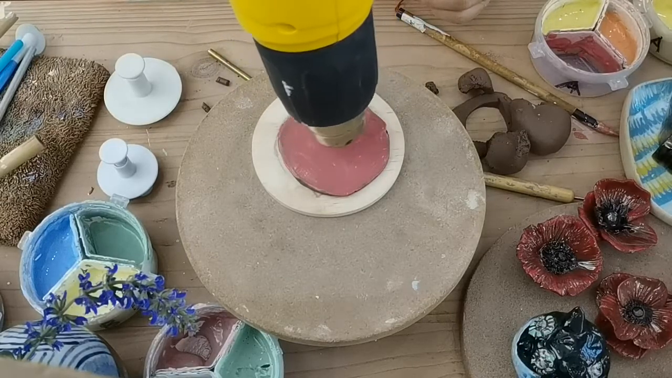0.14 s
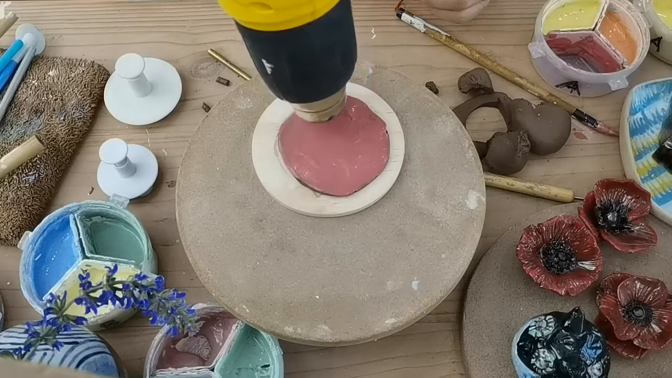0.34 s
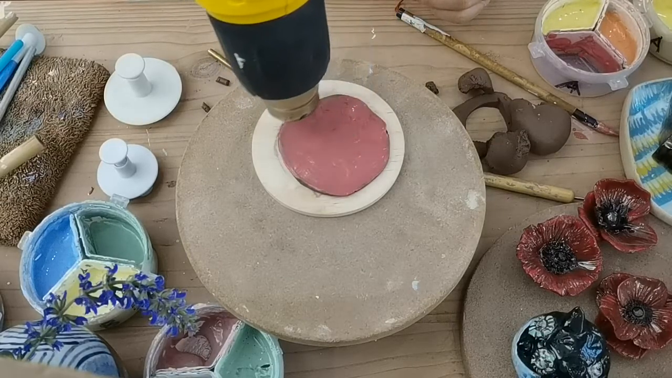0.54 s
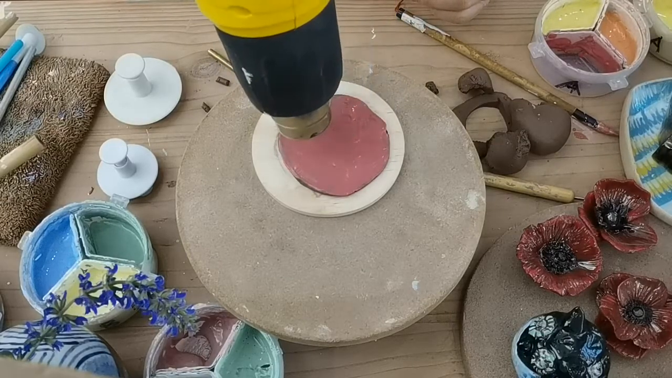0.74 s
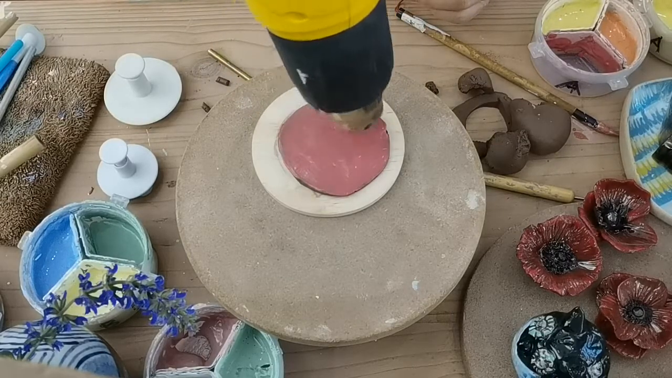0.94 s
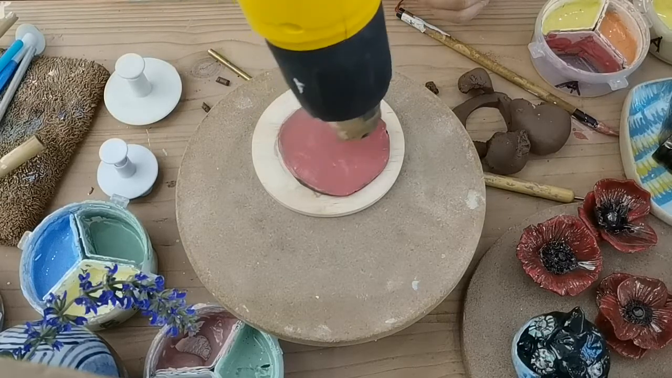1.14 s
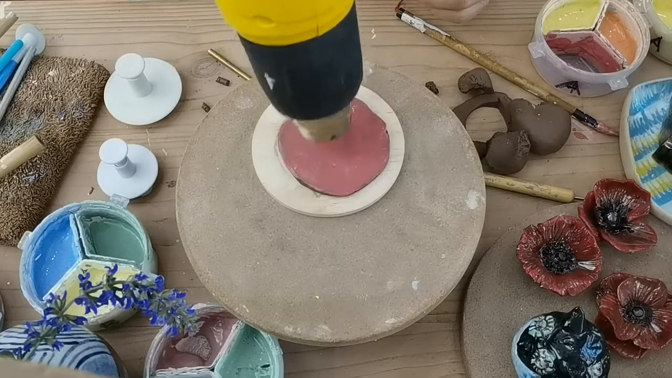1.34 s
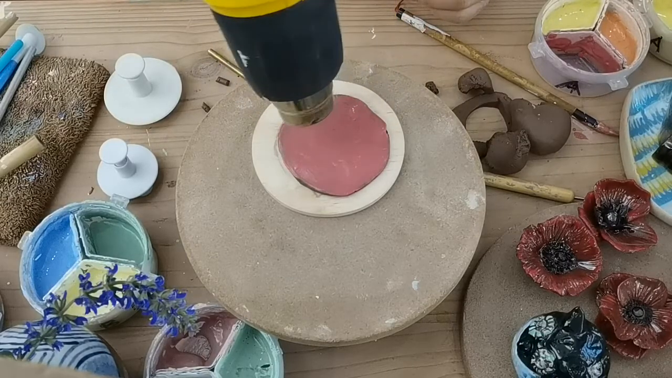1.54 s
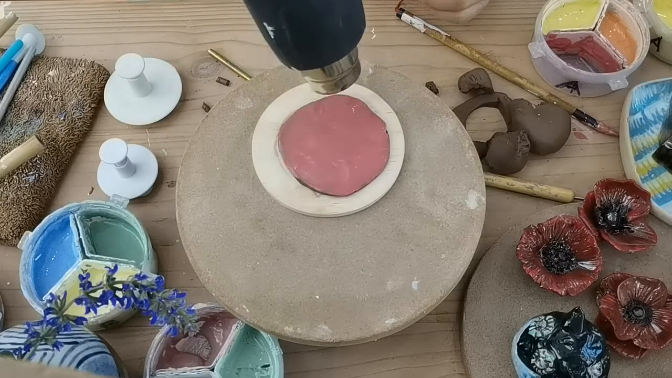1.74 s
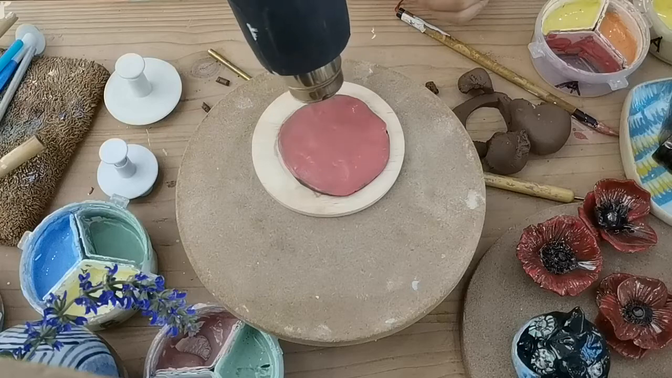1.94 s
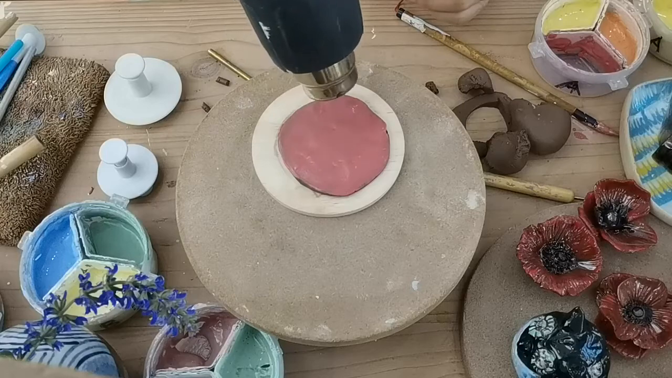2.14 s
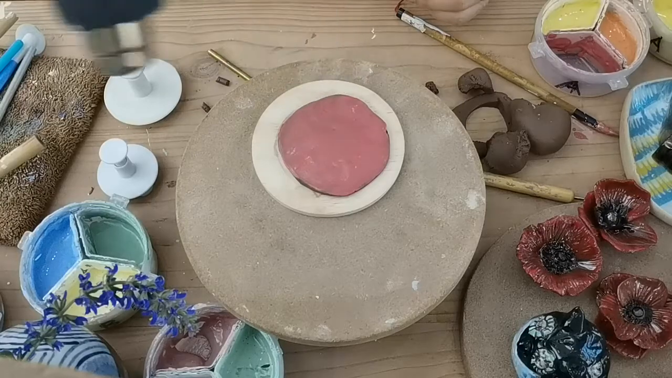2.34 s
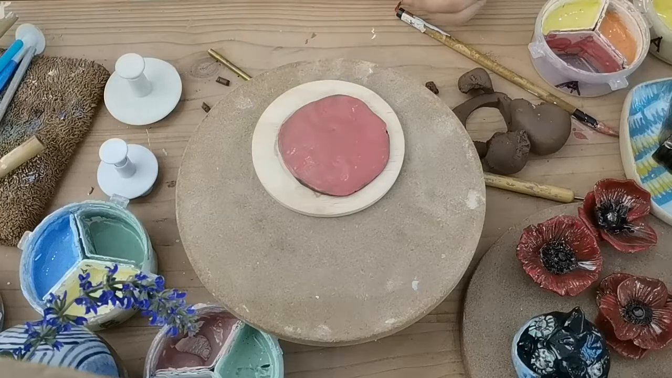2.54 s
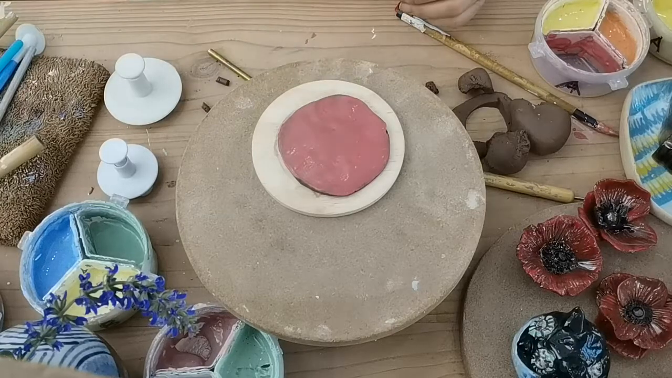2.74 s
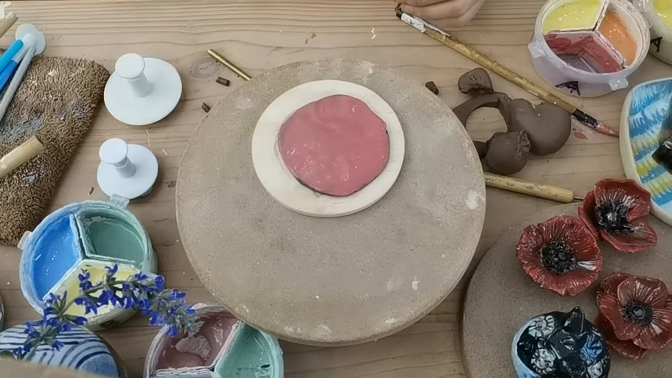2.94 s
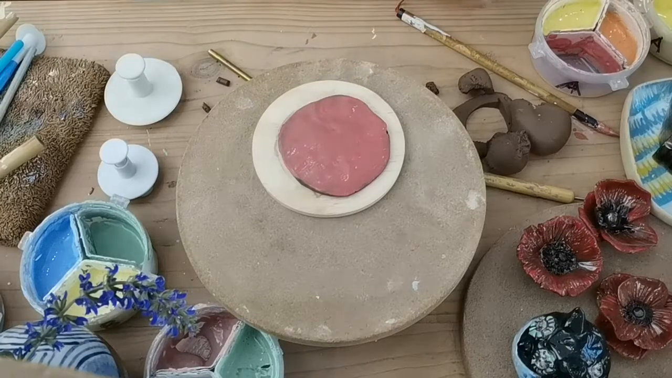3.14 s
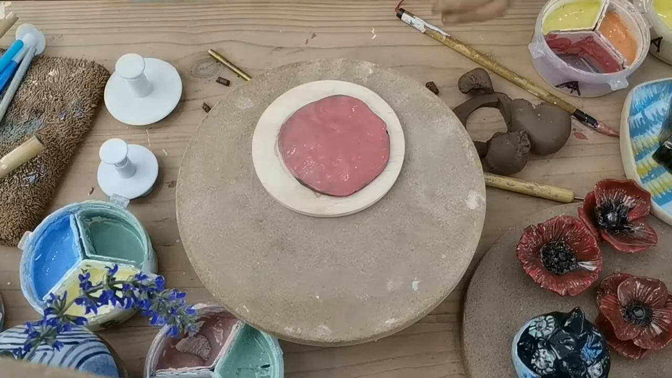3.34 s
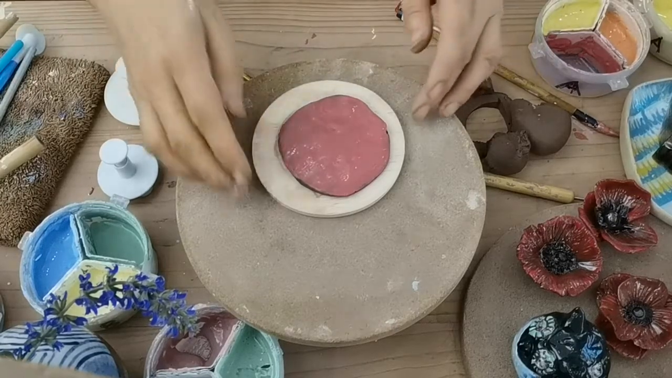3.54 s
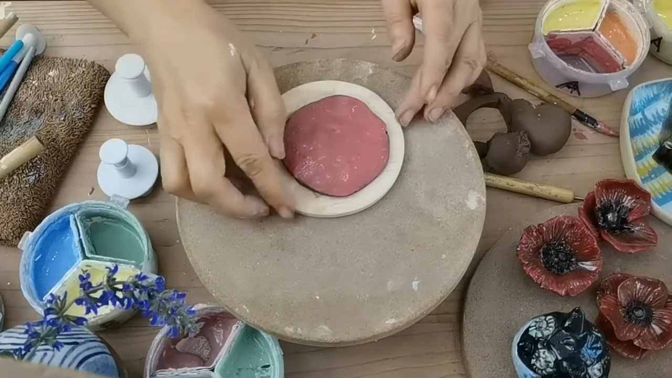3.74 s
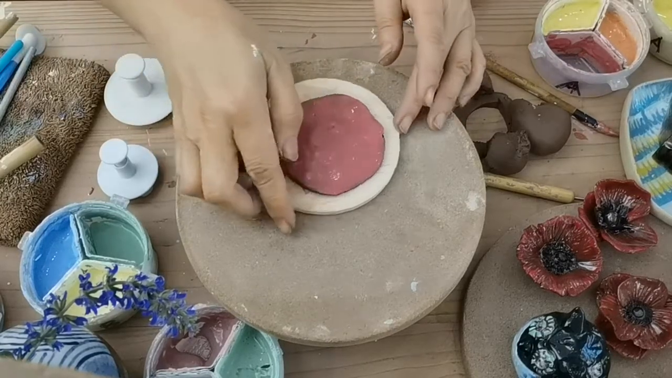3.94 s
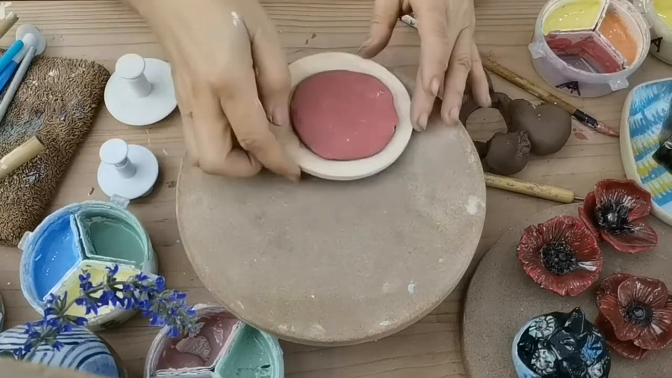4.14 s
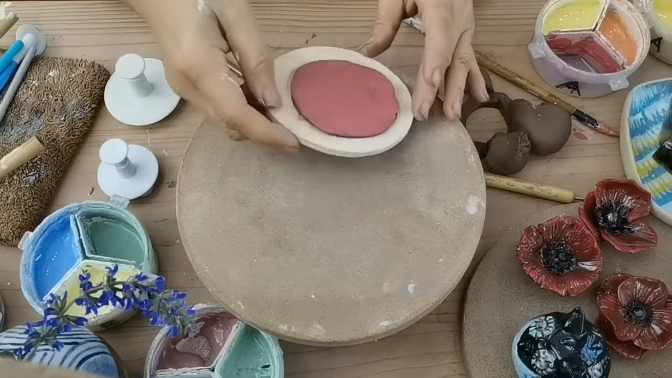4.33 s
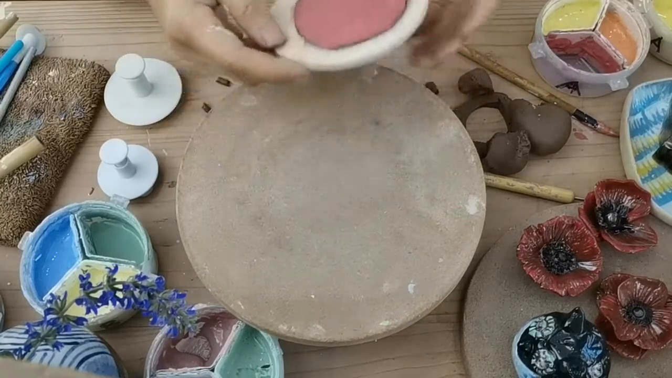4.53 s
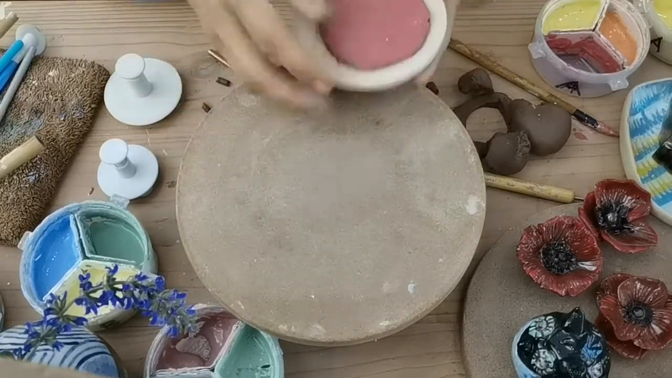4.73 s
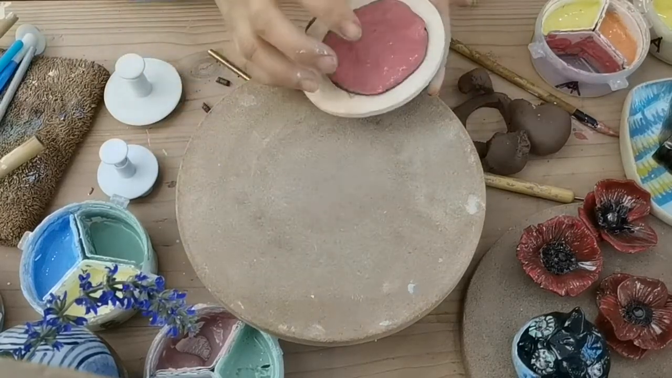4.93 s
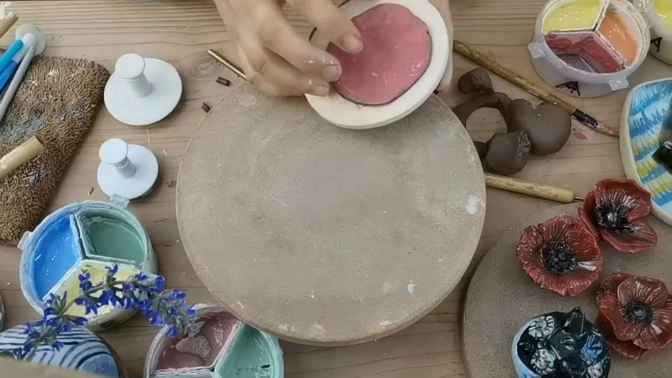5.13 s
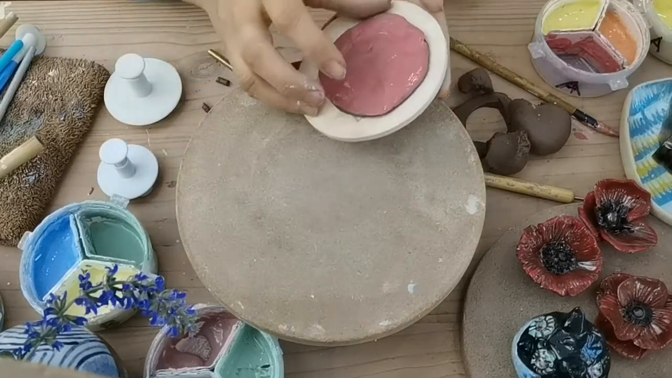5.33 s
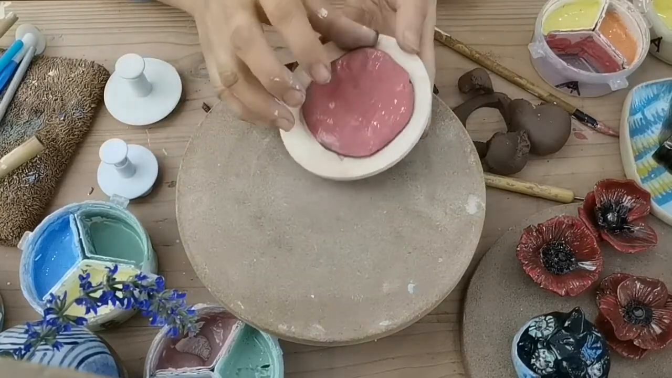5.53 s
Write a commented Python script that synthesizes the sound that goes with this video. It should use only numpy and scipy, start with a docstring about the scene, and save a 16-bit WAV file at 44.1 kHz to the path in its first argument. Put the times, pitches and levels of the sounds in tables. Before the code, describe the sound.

Stereo close microphone above a craft table. Rushing hot air and a buzzing motor whine, slightly shifting in brightness as the tool is waved, then a double click, a falling blade tone and fading whirr. A woody knock follows as the tool is laid down, with a short room ring. Afterwards only low room rumble, skin rubbing, light plate scraping and a small ceramic tick, very quiet.

```python
"""A heat gun roars over a craft bench: rushing air is shaped noise, and its whine is a stack of sine tones.
Two clicks of ringing noise switch it off; the whirr and blade tone fade as it coasts down.
It is laid on the wood, which rings as a set of dying tones, then hands rub, slide and lift a small plate.
A thin whistle and pips join them, over soft room noise and a low wavering hum of two tones."""
import sys
import numpy as np
from scipy import signal
from scipy.io import wavfile
from scipy.ndimage import uniform_filter1d, map_coordinates

SR = 44100
rng = np.random.default_rng(int(sys.argv[2]) if len(sys.argv) > 2 else 0)


def generate_wav(signal):
    """Clip the signal to [-1, 1] and save it as 16-bit WAV at the path in sys.argv[1]."""
    frames = np.transpose(np.atleast_2d(signal))
    scaled = np.clip(frames, -1, 1) * 32767
    pcm = np.round(scaled).astype(np.int16)
    wavfile.write(sys.argv[1], SR, pcm)


N = 246078
T = np.arange(N) / SR

# broad rush of air, relative power in each hertz: pitch_hz, level_db
AIR_SPECTRUM = [(26, -23.5), (45, -24), (92, -15), (262, -9.5), (439, -15), (915, -9), (1170, -3),
                (1820, -5), (3110, -13.5), (4070, -11.5), (8700, -15.5), (9360, -12), (10100, -9.5),
                (14200, -21), (15700, -34.5)]
# barrel and intake resonances: pitch_hz, width_hz, lift_db
BARREL_RESONANCES = [(302, 150, -3), (1133, 240, 3), (1822, 260, 8), (2662, 330, 4.5), (3433, 130, 5.5),
                     (4235, 400, 4), (5936, 400, 0.5), (7750, 540, 5), (8700, 240, 10), (9740, 300, -11.5),
                     (10150, 780, 6), (11040, 500, 3.5), (15300, 1600, -10.5)]
# the gun is waved over the plate: time_s, airflow_db, treble_db (against the body)
WAVING = [(0, -25, -7), (.3, -26, -5.5), (.6, -28, -1.5), (.9, -27, -3.5), (1.25, -25.5, -6),
          (1.55, -26.5, -3.5), (1.85, -27, -4.5), (2.1, -27, -3)]
# whine, one row for each multiple of the shaft speed, from the first up: level_db (before wavering)
WHINE_LEVELS = [-52.0, -66.5, -52.5, -57.0, -53.0, -43.5, -54.0, -53.5, -63.0, -53.5, -70.0, -61.5, -58.0,
                -54.0, -53.5, -58.5, -56.5, -71.0, -63.5, -66.5, -64.0, -61.0, -71.5, -53.0, -62.5, -68.5,
                -60.0, -49.0, -56.5, -56.5, -57.0, -49.5, -63.0, -61.0, -49.5, -47.5, -55.0, -58.0, -58.5,
                -58.0, -51.5, -52.5, -56.5, -58.0, -57.0, -58.5, -58.0, -56.0, -55.5, -55.0, -63.5, -64.0,
                -59.0, -64.0]
# coasting whirr, relative power in each hertz: pitch_hz, level_db
ROTOR_SPECTRUM = [(180, -36.5), (300, -12), (675, -2.5), (2300, -20), (4170, -11.5), (5340, -30),
                  (7080, -17.5), (9850, -18), (15700, -24)]
# housing resonances under the whirr: pitch_hz, width_hz, lift_db
HOUSING_RESONANCES = [(980, 240, 4), (2660, 600, 7), (4220, 400, 0.5), (7220, 600, 6), (8500, 600, 4.5),
                      (9860, 540, 9), (10670, 400, -0.5), (12600, 500, 5)]
# how alike left and right are in the gun's noise: pitch_hz, likeness (0 to 1)
GUN_LIKENESS = [(60, 0.93), (250, 1), (500, .9), (1000, 0.82), (1700, 0.94), (2500, 0.92), (4000, 0.29),
                (8000, 0.13), (15000, .3)]
# left-right balance of the gun's air and whine: pitch_hz, left_minus_right_db
GUN_LEAN = [(60, 0), (120, 0.5), (240, -0.5), (480, -1), (950, -1.5), (1890, -1.5), (3770, -3.5), (7520, 3),
            (15000, 0.5)]
# quiet room noise, relative power in each hertz: pitch_hz, level_db
ROOM_SPECTRUM = [(26, -37.5), (45, -3), (63, -4.5), (114, -9), (196, -16.5), (379, -18.5), (472, -22),
                 (1170, -28), (2210, -41), (2690, -43.5), (5740, -52.5), (7150, -50.5), (15700, -49.5)]
# faint bands in the room noise: pitch_hz, width_hz, lift_db
ROOM_STREAKS = [(2300, 300, 0.5), (4160, 460, 4.5), (5460, 900, -0.5), (7300, 500, 2.5), (10000, 600, 2),
                (12800, 500, 1.5)]
# how alike left and right are in the room noise: pitch_hz, likeness (0 to 1)
ROOM_LIKENESS = [(60, 0.45), (250, 0.8), (550, 0.11), (1650, 0.17), (5000, 0.18), (15000, .1)]
# low hum before wavering: time_s, lower_tone_db, upper_tone_db
HUM_LEVELS = [(0.0, -62, -49.5), (0.68, -49, -52), (0.79, -41, -55), (1.35, -42, -55), (1.38, -38.5, -55),
              (1.75, -35.5, -47), (1.83, -36, -49), (2.11, -42.5, -45.5), (2.38, -42.5, -37.5),
              (2.98, -57, -48), (3.15, -45, -48), (3.26, -59, -53.5), (3.46, -53.5, -64),
              (3.76, -53.5, -50.5), (4.01, -65.5, -62.5), (4.35, -39.5, -52.5), (4.65, -51, -49.5),
              (4.74, -53, -71.5), (5.07, -60, -60.5), (5.16, -48.5, -51), (5.35, -69, -60),
              (5.46, -59, -77), (5.53, -47, -58), (5.58, -51, -61)]
# middle pitch of the lower and upper hum tones: pitch_hz
HUM_PITCHES = (28.8, 41.5)
# switch snaps: time_s, rattle_db, ring_hz, thock_db
SNAPS = [(2.086, -15, 7890, -20), (2.151, -14, 5600, -14.5)]
# room ring: pitch_hz, t60_s (time to die by 60 dB)
ROOM_RING = [(200, 0.31), (1000, 0.35), (4000, 0.23), (12000, 0.54)]
# blows on the bench: start_s, strength_db, hardness_db_per_octave, crack_db, crack_hz
BLOWS = [(3.0296, -26.5, 11, -24, 1970), (3.04, -34.5, 6.5, -50, 2000), (3.055, -23, -3, -30.5, 3860),
         (3.059, -39.5, -5, -40, 8600), (3.116, -36, -6, -62, 4000), (3.176, -43, -3, -55, 5500)]
# ringing tones of bench and housing: pitch_hz, level_db, t60_s
BENCH_MODES = [(105.5, -5, 0.24), (125.6, -4.5, 0.3), (148, -7, 0.101), (212.6, -7.5, 0.1),
               (293, -1, 0.075), (328, -8.5, 0.15), (350, -6.5, 0.075), (384.7, -1, 0.15),
               (425, -5.5, 0.16), (550, -15, 0.042), (665, -17.5, 0.036), (1075, -17, 0.1),
               (1211, -5, 0.053), (1230, -10, 0.039), (1400, -8.5, 0.023), (1650, -16.5, 0.03),
               (1760, -21, 0.03843), (2422, -25.5, 0.088)]
# finger rubs: start_s, length_s, level_db, pitch_hz, width_hz, left_minus_right_db
RUBS = [(3.675, 0.082, -68.5, 6150, 500, 1), (3.949, 0.23, -61, 265, 180, -1.5),
        (3.883, 0.33, -71, 9250, 3950, -3), (4.158, 0.08, -58.5, 3360, 2500, 4),
        (4.243, 0.067, -64.5, 8500, 4030, 2), (5.08, 0.16, -73, 8240, 1800, 6),
        (5.3, 0.21, -77.5, 10200, 800, -8)]
# plate scrapes: start_s, length_s, level_db, brightness_db_per_octave, left_minus_right_db
SCRAPES = [(4.018, 0.28, -53, 0, -1), (4.376, 0.056, -57, 8, -1), (4.77, 0.079, -55.5, 13, 0),
           (5.195, 0.082, -68, 1.5, -0.5)]
# noise bands of a scrape: pitch_hz, width_hz, level_db
SCRAPE_BANDS = [(248, 124, 1), (1280, 560, -4.5), (2030, 600, -4), (4400, 1600, -1), (7400, 2100, -4.5),
                (9800, 1400, -6), (13000, 1800, -14.5)]
# plate ticks: start_s, level_db, ring_hz, t60_s
TICKS = [(4.3803, -27.5, 2100, 0.012), (4.394, -57, 9700, 0.032), (4.782, -55.5, 2030, 0.082),
         (4.794, -54.5, 1940, 0.1), (5.198, -66.5, 1980, 0.18), (5.535, -65.5, 1960, 0.071)]
# thin whistles: start_s, length_s, level_db
WHISTLES = [(4.57, 0.382, -73.5), (5.025, .05, -86)]

POWER_OFF_S, SHAFT_HZ = 2.127, 279.24
LEFT_LAG_S = 6e-5  # the rush reaches the left side this much later
FLOW_FALL_DB_PER_S, FLOW_KNEE_S = 63, 0.12  # airflow dies once power is off, after a soft knee
# whirr before its fade-in: level at the peak, and the peak's delay after power off
WHIRR_DB, WHIRR_PEAK_S, WHIRR_RISE_DB_PER_S = -35, 0.26, 54
WHIRR_DROP_DB, WHIRR_DROP_S, WHIRR_FALL_DB_PER_S = 10.5, 0.22, 32  # then a quick drop and a steady fall
ROOM_DB, HUM_WAVER_DB = -54, 3.5
RIGHT_LAG_SAMPLES = 7  # the gun is laid down left of the microphone
OCTAVE_DB = -3  # a rub also sounds an octave up
WHISTLE_HZ = 8690
PIPS_S, PIP_COUNT, PIPS_PER_S, PIP_DB = 4.655, 4, 15.8, -79  # faint pips a fifth below the whistle
EDGE_HZ = 15550  # top of the whole sound


def gain_of(db):
    """Turns decibels into a factor."""
    return 10 ** (np.asarray(db) / 20)


def evened(x):
    """Scales a sound to rms 1."""
    return x / np.sqrt(np.mean(x ** 2) + 1e-20)


def read(points, hz):
    """Reads a pitch table between its points, on a log-frequency axis."""
    f, value = np.transpose(points)
    return np.interp(np.log(hz + 1), np.log(f + 1), value)


def curve(rows, axis):
    """Reads one column of a time table at every sample."""
    rows = np.array(rows)
    return np.interp(T, rows[:, 0], rows[:, axis])


def add(mix, s, sound):
    """Mixes a sound in at time s, cut off at the end of the scene."""
    part = mix[..., round(s * SR):][..., :sound.shape[-1]]
    part += sound[..., :part.shape[-1]]


def wander(rate):
    """Drifts smoothly through random values of about rms 1, rate values a second."""
    knots = rng.standard_normal(400)
    return map_coordinates(knots, [T * np.clip(rate, .1, 60)], order=3)


def band(x, hz, width):
    """Keeps the part of a sound around hz."""
    edges = np.clip([hz - width / 2, hz + width / 2], 30, SR / 2 - 500)
    return signal.sosfilt(signal.butter(2, edges, "band", fs=SR, output="sos"), x)


def lowpass(x, hz):
    """Keeps the part of a sound below hz, without delay."""
    return signal.sosfiltfilt(signal.butter(2, hz, fs=SR, output="sos"), x)


def rush(shape, peaks, same, patchy_db, lean=((1, 0), (2, 0)), lag=0):
    """Makes stereo noise of rms 1 with resonances and drifting louder and softer patches."""
    hz = np.fft.rfftfreq(1024, 1 / SR)
    a, b, c, d, patches = rng.standard_normal((N // 256 + 5, 513, 5)).T
    patches = uniform_filter1d(patches, size=6, axis=0)  # smooth over pitch, then over time
    patches = evened(uniform_filter1d(patches, size=16, axis=1))
    colour_db = read(shape, hz) + sum(db / (1 + (2 * (hz - f) / w) ** 4) for f, w, db in peaks)
    alike = np.clip(read(same, hz), 0, 1)[:, None]
    left = a + 1j * b
    right = alike * left + np.sqrt(1 - alike ** 2) * (c + 1j * d)
    right = right * np.exp(2j * np.pi * hz * lag)[:, None]  # moved earlier, so the left lags
    tilt = gain_of(read(lean, hz) / 2)[:, None]
    z = np.array([left * tilt, right / tilt])
    z = z * gain_of(colour_db)[:, None] * gain_of(patchy_db * patches)
    return evened(signal.istft(z, nperseg=1024, noverlap=768)[1][:, :N])


def since_power_off():
    """Counts the seconds since the power went off, zero before that."""
    return np.maximum(T - POWER_OFF_S, 0)


def air_rush():
    """Turbulent air resonates in the barrel; once unpowered it slows, growing softer and duller."""
    slowing_db = FLOW_FALL_DB_PER_S * (FLOW_KNEE_S - np.hypot(since_power_off(), FLOW_KNEE_S))
    air = rush(AIR_SPECTRUM, BARREL_RESONANCES, GUN_LIKENESS, patchy_db=1.73, lean=GUN_LEAN, lag=LEFT_LAG_S)
    body = lowpass(air, 1500)
    treble = gain_of(curve(WAVING, axis=2) + 1.1 * slowing_db)
    return gain_of(curve(WAVING, axis=1) + slowing_db) * (body + treble * (air - body))


def shaft_whine():
    """The turning shaft whines at multiples of its speed until power off."""
    turns = SHAFT_HZ * T + 0.0067 * wander(rate=8)  # the speed hunts a little
    whine = np.zeros((2, N))
    for k, db in enumerate(WHINE_LEVELS, start=1):
        # each multiple wavers and leans on its own as the gun is waved
        lean_db = read(GUN_LEAN, k * SHAFT_HZ) + 3 * wander(rate=5.9)
        slip = 0.28 * wander(rate=11) + rng.uniform(0, 2 * np.pi, (2, 1))
        level = np.sqrt(2) * gain_of(db + 2.5 * wander(rate=22) + np.array([lean_db, -lean_db]) / 2)
        whine += level * np.sin(2 * np.pi * k * turns + slip)
    return whine * np.clip((POWER_OFF_S - T) / 0.013, 0, 1)


def room_noise():
    """The quiet room is soft, mostly deep noise with faint bands."""
    return gain_of(ROOM_DB) * rush(ROOM_SPECTRUM, ROOM_STREAKS, ROOM_LIKENESS, patchy_db=2.5)


def hum():
    """Two low tones swell and waver in level and pitch."""
    out = np.zeros(N)
    for k, hz in enumerate(HUM_PITCHES, start=1):
        level = np.sqrt(2) * gain_of(curve(HUM_LEVELS, axis=k) + HUM_WAVER_DB * wander(rate=7.3))
        out += level * np.sin(2 * np.pi * np.cumsum(hz + 0.8 * wander(rate=2.9)) / SR)
    return out


def switch():
    """A slider snaps over two detents: a quick swelling rattle, a plastic ring and a low thock."""
    out, t = np.zeros(N), T[:2600]
    for s, db, hz, thock_db in SNAPS:
        grit = rng.standard_normal(len(t))
        fade = gain_of(-60 * np.maximum(t - .003, 0) / 0.016) + 0.11 * gain_of(-60 * t / 0.08)
        swell = np.minimum(t / 0.0048, 1) ** 2 * fade
        rattle = 1.06 * evened(band(grit, 8500, 11000))
        ring = .5 * evened(band(grit, hz, 2000))
        thock = gain_of(thock_db - 60 * t / 0.02) * np.minimum(t / 0.0037, 1) * np.sin(2 * np.pi * 570 * t)
        add(out, s - .003, gain_of(db) * swell * (rattle + ring) + thock)
    return out


def echo(x):
    """The room answers with sparse echoes of random sign, each band dying at its own speed."""
    taps = np.zeros((2, 20000))
    at = np.arange(200, 19980, 20) + rng.integers(0, 20, (2, 989))
    np.put_along_axis(taps, at, rng.choice([-1., 1.], at.shape), 1)
    hz, t, z = signal.stft(taps, SR, nperseg=256)
    tail = signal.istft(z * gain_of(-60 * t / read(ROOM_RING, hz)[:, None]), SR, nperseg=256)[1]
    tail = tail / np.linalg.norm(tail, axis=1, keepdims=True)
    wet = signal.fftconvolve(x, tail, axes=1)[:, :N]
    bass = lowpass(wet, 600)
    return wet - .85 * (bass - bass[0])  # long waves reach both sides nearly alike


def rotor_whirr():
    """The unpowered rotor whirrs in its housing: noise that rises, drops quickly, then dies steadily."""
    since = since_power_off()
    past = np.maximum(since - WHIRR_PEAK_S, 0)
    rise_db = -WHIRR_RISE_DB_PER_S * np.maximum(WHIRR_PEAK_S - since, 0)
    drop_db = -WHIRR_DROP_DB * (1 - np.exp(-past / WHIRR_DROP_S))
    level = gain_of(WHIRR_DB + rise_db + drop_db - WHIRR_FALL_DB_PER_S * past)
    fade_in = np.clip(since / 0.71, 0, 1)
    return level * fade_in * rush(ROTOR_SPECTRUM, HOUSING_RESONANCES, GUN_LIKENESS, patchy_db=2.2)


def blades():
    """Once unpowered the rotor slows under air drag, and the fuzzy blade tone slides down with it."""
    since = since_power_off()
    hz = 6 * SHAFT_HZ / (1 + since / .6)  # six blades
    grit = rng.standard_normal(N) + 1j * rng.standard_normal(N)
    fuzz = signal.lfilter([1], [1, -np.exp(-np.pi * 45 / SR)], grit)  # narrow noise, moved up to the tone
    tone = evened((fuzz * np.exp(2j * np.pi * np.cumsum(hz) / SR)).real)
    # it swells while crossing two barrel resonances
    tone = band(tone, 1170, 159) + 0.72 * band(tone, 950, 130) + 0.069 * tone
    return tone * gain_of(-30 - 53 * since) * np.clip(since / .15, 0, 1)


def bench():
    """The gun lands and rocks; each blow rings the wood, harder ones more brightly, with a short crack."""
    out, t = np.zeros(N), T[:22000]
    for s, db, hard_db, crack_db, crack_hz in BLOWS:
        # loose parts keep tapping after the blow
        chatter = 0.071 * rng.standard_normal(6000) * gain_of(-60 * t[:6000] / 0.081)
        chatter[0] = -1  # the blow itself
        ring = np.zeros(len(t))
        for hz, mode_db, t60 in BENCH_MODES:
            bright_db = hard_db * np.clip(np.log2(hz / 400), -1.3, 1)
            ring += gain_of(mode_db + bright_db - 60 * t / t60) * np.sin(2 * np.pi * hz * t)
        crack = evened(band(rng.standard_normal(len(t)), crack_hz, crack_hz)) * gain_of(crack_db)
        crack = crack * (gain_of(-60 * t / 0.038) + 0.07 * gain_of(-60 * t / 0.14))
        add(out, s, gain_of(db) * signal.oaconvolve(ring, chatter)[:len(t)] + crack)
    # a small bench radiates no deep bass
    return signal.sosfilt(signal.butter(4, 85, "high", fs=SR, output="sos"), out)


def stroke(length, db, lean_db, bands):
    """Rubbing makes grainy noise in bands (pitch_hz, width_hz, level_db) that grips fast and trails off."""
    grit = rng.standard_normal((3, 12000))[:, :round(length * SR)]
    u = np.linspace(0, 1, grit.shape[1])
    shape = abs(np.sin(np.pi * u ** 0.58)) ** 1.73 * gain_of([[db + lean_db / 2], [db - lean_db / 2]])
    grain = grit[:2] + 0.48 * grit[2]  # left and right share some noise
    skin = sum(gain_of(b_db) * evened(band(grain, hz, width)) for hz, width, b_db in bands)
    return shape * evened(skin + 0.14 * np.roll(skin, shift=31, axis=1))  # a bounce off the bench combs the hiss


def hands():
    """Fingers rub and the plate scrapes, both with an uneven grip."""
    out = np.zeros((2, N))
    for s, length, db, hz, width, lean_db in RUBS:
        add(out, s, stroke(length, db, lean_db, [(hz, width, 0), (2 * hz, 2 * width, OCTAVE_DB)]))
    for s, length, db, bright_db, lean_db in SCRAPES:
        bands = [(f, w, b + bright_db * np.log2(f / 4000)) for f, w, b in SCRAPE_BANDS]
        add(out, s, stroke(length, db, lean_db, bands))
    return out * gain_of(2.1 * wander(rate=60))


def plate():
    """The plate ticks: a short ring of noise and a pure tone, with a spit of noise."""
    out, t = np.zeros(N), T[:6000]
    for s, db, hz, t60 in TICKS:
        ring = evened(band(rng.standard_normal(len(t)), hz, 771.6)) * gain_of(-6.5 - 60 * t / t60)
        spit = band(rng.standard_normal(len(t)), 3600, 6600) * gain_of(-11.0 - 60 * t / 0.0071)
        tone = np.minimum(t * hz / 2, 1) * gain_of(1.5 - 60 * t / (0.61 * t60)) * np.sin(2 * np.pi * hz * t)
        add(out, s, gain_of(db) * (ring + spit + tone))
    return out


def whistle():
    """A thin wavering whistle sounds towards the left, with a few pips below it."""
    turn = 2 * np.pi * WHISTLE_HZ * T + 1.2 * wander(rate=56)
    level = np.zeros(N)
    for s, length, db in WHISTLES:
        level += gain_of(db) * np.clip(np.minimum(T - s, s + length - T) / 0.013, 0, 1)
    beat = (T - PIPS_S) * PIPS_PER_S
    pips = gain_of(PIP_DB) * (beat > 0) * (beat < PIP_COUNT) * np.sin(np.pi * beat) ** 4
    tone = level * gain_of(3 * wander(rate=40)) * np.sin(turn) + pips * np.sin(turn * 2 / 3)
    return tone * gain_of([[4], [-4]])


def scene():
    """Adds up every source, with the room's ring on the hits."""
    gun = air_rush() + shaft_whine() + rotor_whirr() + blades()
    blows, ticks = bench(), plate()
    blows = np.array([blows, np.roll(blows, RIGHT_LAG_SAMPLES)])
    knocks = switch() * gain_of([[.6], [-.6]]) + blows * gain_of([[-.2], [.2]])  # left, right dB
    ring = echo(gain_of(-2.0) * knocks + gain_of(-6.5) * ticks)  # the plate is nearer, so drier
    room = room_noise() + hum() * gain_of([[.4], [-.4]])
    return gun + knocks + ticks + ring + hands() + whistle() + room


def record(dry):
    """Removes everything above the top edge with a steep filter."""
    return signal.oaconvolve(dry, signal.firwin(511, EDGE_HZ, window=("kaiser", 9), fs=SR)[None], "same")


dry = scene()
out = record(dry)
generate_wav(out)
```